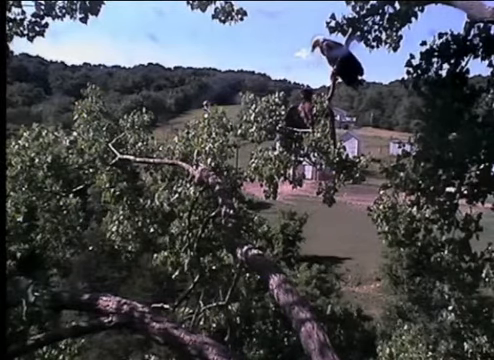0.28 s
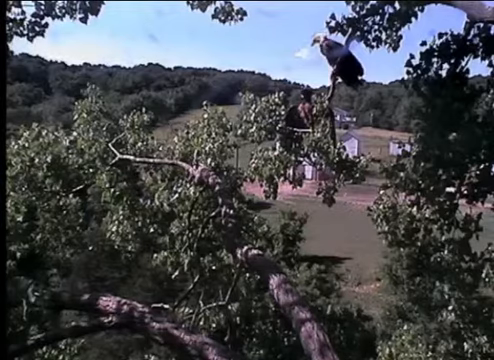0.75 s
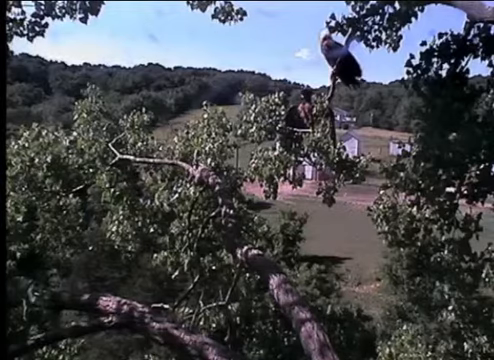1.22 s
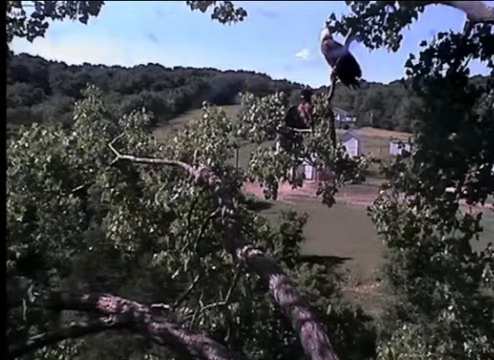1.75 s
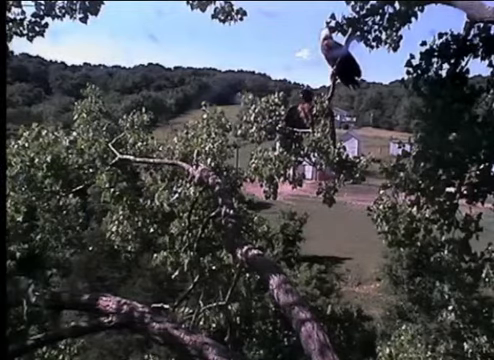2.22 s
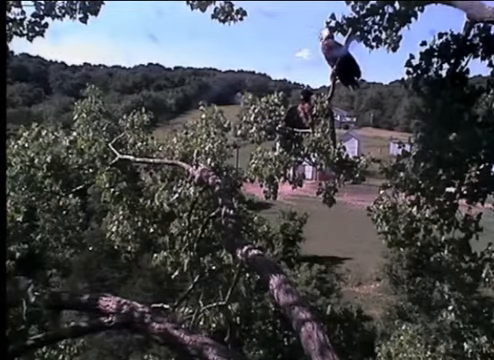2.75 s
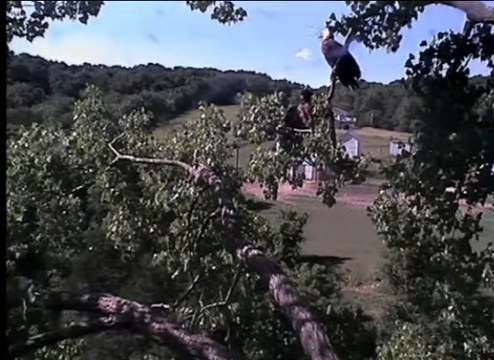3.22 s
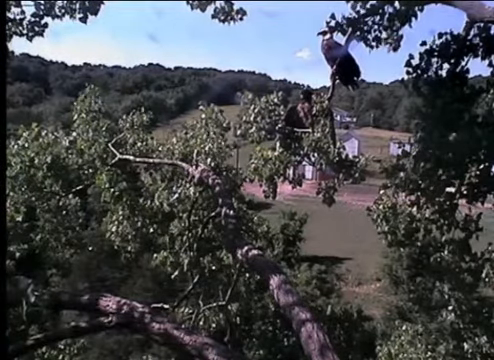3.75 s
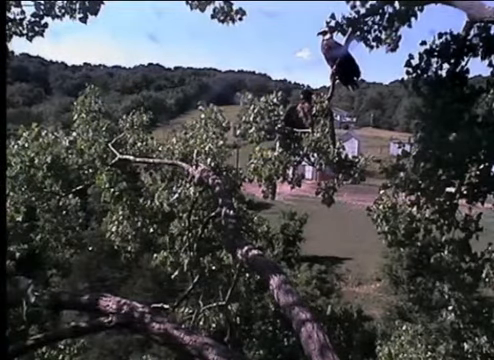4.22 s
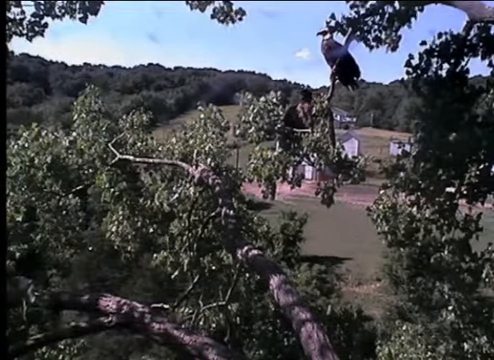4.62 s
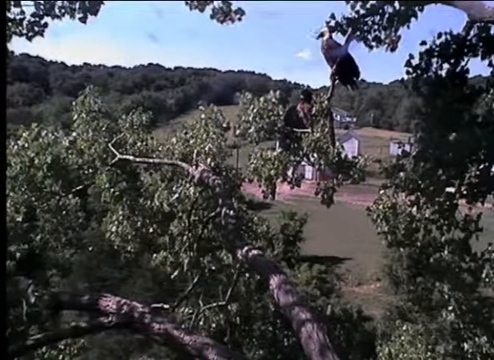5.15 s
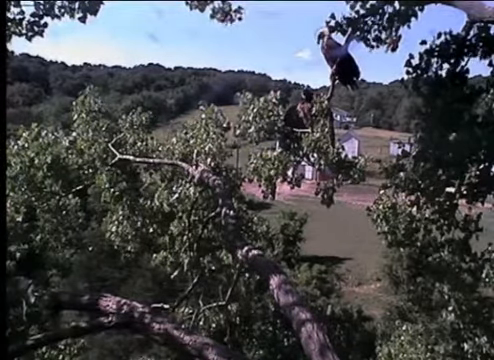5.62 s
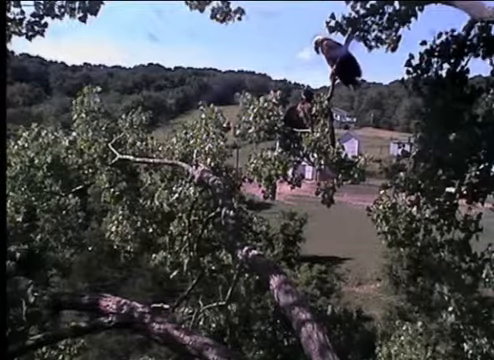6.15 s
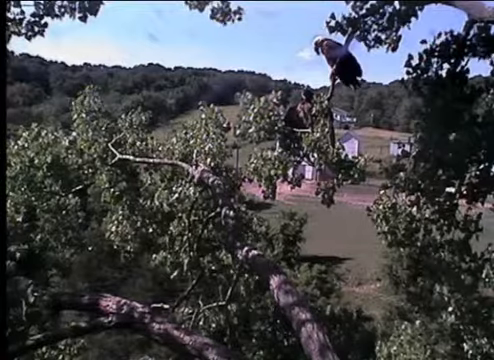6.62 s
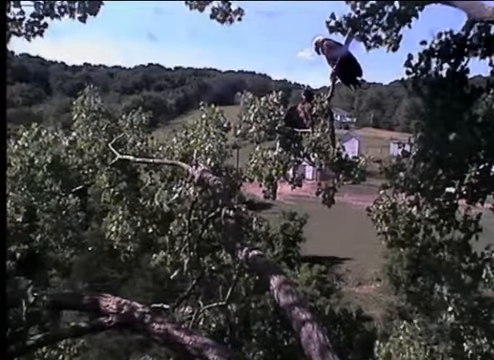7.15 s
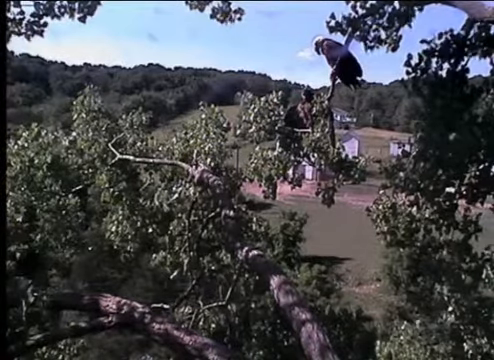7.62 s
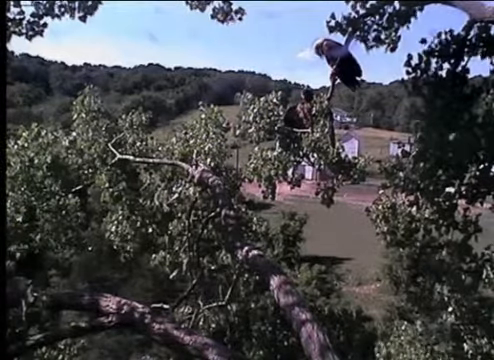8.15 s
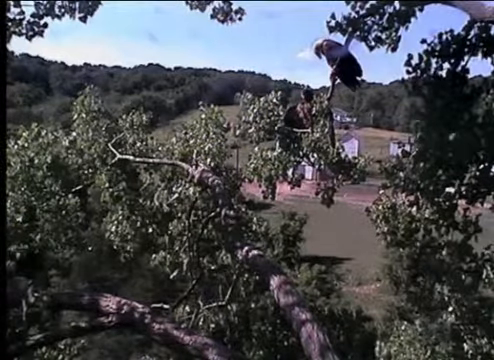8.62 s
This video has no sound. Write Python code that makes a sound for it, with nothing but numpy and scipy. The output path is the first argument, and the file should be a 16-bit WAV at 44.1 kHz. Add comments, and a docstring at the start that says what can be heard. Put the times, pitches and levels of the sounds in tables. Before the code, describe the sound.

Shrill eagle whistles come about once a second, each climbing then breaking off abruptly, with leafy echoes under constant strong microphone-line hiss.

```python
"""An eagle in a treetop repeats a thin rising whistle that drops away at its end: a wavering near sine with
overtones folded back down by the converter, and one brief high overtone as a bell-shaped tone of its own.
Small birds chip in as short bell-shaped whistles further off. Branches, ground and leaves return echoes and
a tail; a limiter evens out the notes. The long microphone line adds loud pink hiss, a faint hum and a slow
drift. Only the left input is wired: the right one is a constant near full scale with faint low-passed noise."""
import sys
import numpy as np
from scipy import signal
from scipy.fft import rfft, irfft, next_fast_len
from scipy.io import wavfile
from scipy.ndimage import uniform_filter1d

SR = 44100
rng = np.random.default_rng(int(sys.argv[2]) if len(sys.argv) > 2 else 0)


def digitize_waveform(pressure):
    """Quantize a signal to 16-bit integers and store it at the path in sys.argv[1].

    Rows of a 2-D input are taken as channels; values are limited to [-1, 1].
    """
    field = np.atleast_2d(pressure).T
    bounded = np.clip(field, -1, 1)
    quanta = np.round(bounded * 32767).astype(np.int16)
    wavfile.write(sys.argv[1], SR, quanta)


N = 391166

# Note and bird levels are set ahead of limiter and preamp; line levels ahead of the preamp.
# Held rising notes, one list each, up to where the pitch breaks: [t/s, f/Hz]
HELD_NOTES = [
    [(0.135, 4060), (0.18, 4135), (0.195, 4090), (0.245, 4230), (0.295, 4220), (0.323, 4160), (0.433, 4235),
     (0.511, 4335), (0.559, 4340), (0.573, 4260), (0.582, 4091)],
    [(1.042, 4119), (1.08, 4180), (1.115, 4240), (1.24, 4210), (1.3, 4240), (1.33, 4360), (1.478, 4490),
     (1.52, 4510), (1.533, 4180)],
    [(1.99, 3870), (2.016, 4030), (2.036, 4130), (2.1, 4075), (2.256, 4290), (2.282, 4390), (2.406, 4530),
     (2.424, 4100)],
    [(2.854, 3930), (2.876, 3940), (2.89, 4080), (2.91, 4060), (2.928, 4170), (2.96, 4200), (2.985, 4110),
     (3.02, 4195), (3.05, 4185), (3.216, 4310), (3.24, 4260), (3.257, 4160)],
    [(3.77, 3855), (3.795, 3980), (3.83, 4010), (3.856, 3950), (3.98, 4135), (4.056, 4144), (4.104, 4070),
     (4.12, 3950)],
    [(4.742, 3940), (4.804, 3950), (4.808, 4080), (4.82, 3960), (4.898, 4070), (5.04, 4140), (5.066, 4120),
     (5.085, 4020)],
    [(5.632, 3820), (5.642, 3960), (5.78, 4090), (5.994, 4190), (6.128, 4380), (6.14, 4220), (6.146, 4100)],
    [(6.585, 3830), (6.665, 4030), (6.899, 4180), (6.933, 4122), (6.945, 4020)],
    [(7.404, 3480), (7.422, 3470), (7.438, 3564), (7.498, 3605), (7.504, 3720), (7.52, 3660), (7.556, 3825),
     (7.652, 3920), (7.692, 4070), (7.758, 4104), (7.816, 4100), (7.85, 4000)],
    [(8.368, 3919), (8.374, 3950), (8.464, 4145), (8.652, 4173), (8.722, 4100), (8.786, 4110),
     (8.836, 4440), (8.87, 4540)],
]
# Short, stepping notes that open each call: [t/s, length/s, first f/Hz, last f/Hz, level/dB]
OPENING_NOTES = [(0.03, .036, 3480, 3560, -41.5), (0.068, .058, 3930, 4060, -38.5),
                 (0.953, .026, 3600, 3540, -39.5), (0.985, .018, 4040, 3930, -36),
                 (1.005, .029, 3960, 4060, -36.5), (1.919, .02, 3520, 3550, -38),
                 (1.941, .015, 3900, 3910, -39), (1.958, .03, 3700, 3830, -39),
                 (2.776, .014, 3140, 3230, -42), (2.792, .029, 3600, 3530, -36),
                 (2.824, .022, 3870, 3820, -38.5), (3.68, .015, 3460, 3420, -44),
                 (3.702, .035, 3610, 3570, -38), (3.747, .019, 3680, 3750, -40),
                 (4.604, .064, 3440, 3610, -39), (4.693, .046, 3710, 3780, -39.5),
                 (5.517, .029, 3440, 3480, -40), (5.549, .032, 3580, 3560, -36.5),
                 (5.59, .018, 3670, 3730, -40), (5.611, .014, 3810, 3840, -39),
                 (6.485, .019, 2950, 3300, -45), (6.507, .024, 3480, 3460, -39.5),
                 (6.534, .017, 3580, 3700, -39), (6.555, .021, 3630, 3720, -37.5),
                 (7.388, .013, 3120, 3170, -42), (8.308, .056, 3820, 3900, -42)]
# Moments when the voice catches inside a held note: [t/s]
VOICE_CATCHES = [2.3, 7.5, 7.63]
# Overtones of the whistle: [multiple of the pitch, level against the whistle at the reference pitch/dB]
WHISTLE_OVERTONES = [(2, -23), (3, -12)]
# Short bell-shaped tones, of two sources: [t/s, f/Hz, level/dB, length/s]
BELL_TONES = [(3.118, 5000, -40, 0.021), (3.356, 3720, -45, 0.021), (3.378, 4010, -39, .014),
              (6.567, 7300, -43, 0.057)]
HIGH_OVERTONES = BELL_TONES[3:]  # brief high overtone of the whistle near 7300 Hz
BIRD_CHIPS = BELL_TONES[:3]  # chips of small birds further off
# Echoes off branches and ground: [delay/s, level before the echo band/dB]
TREE_ECHOES = [(.008, -15), (.016, -14), (.026, -13), (.037, -13.5), (.052, -17), (.07, -20)]
# Edges of the narrow band the echoes and tail are heard in, duller than the note: [f/Hz]
ECHO_BAND = [3300, 4230]
# Spectrum of the line hiss, only its shape counts: [f/Hz, relative level per Hz/dB]
HISS_SHAPE = [(1, 4), (4, -5), (26, -16), (130, -20), (1300, -30), (4000, -35), (7000, -36), (8200, -38.5),
              (9300, -43), (10200, -52), (10900, -65), (11100, -73), (11600, -78)]
# Hum lines: [f/Hz, rms level/dB]
HUM_LINES = [(187.5, -49), (375, -54)]

# Held note: louder the higher it is pushed, and softer at its start
HELD_DB, HELD_DB_PER_KHZ, SWELL_DB = -33, 5, -4.5  # level at the reference pitch
REFERENCE_HZ = 4150
# The pitch drops as the breath runs out
FALL_S, FALL_HZ, FALL_DB = .018, 860, -5.5
EDGE_S, SILENT_DB = .0014, -70  # notes start and stop abruptly
GLIDE_S = .004  # the pitch turns its corners smoothly
CATCH_S, CATCH_DB = .007, -8  # half-width and depth of a catch
OPENING_CRACK = .1  # amount of cracking, 1 in the fall
BREAK_DB = 11  # deepest drop-outs at full crack
OVERTONE_DB_PER_KHZ = -6  # per multiple, either side of the reference pitch
CONVERTER_HZ = 16000  # sampling rate that folds the overtones

FLUTTER_S, FLUTTER_PER_S = .00025, 30  # leaves shake the echo delays
LEAVES_DB, LEAVES_T60_S = -18, .25  # scattered tail off the foliage, ahead of the echo band
LIMIT_DB, LIMIT_RATIO, LIMIT_S = -35, 6, .003  # rms threshold, ratio, averaging time

HISS_DB = -36  # rms from 500 to 2000 Hz
RAIL_NOISE_DB, RAIL_NOISE_HZ = -72.5, 186  # faint noise on the right: rms, low-pass corner
PREAMP_DB = 6
OFFSET, RAIL = -.17, .9993  # resting values of left and right, full scale = 1
TOP_HZ = 11450  # where the steep top cut reaches its floor


def undb(db):
    """dB to gain."""
    return 10 ** (np.asarray(db) / 20)


def walk(rate):
    """Random levels held 1 / rate s and slewed twice; spread near 1."""
    hold = int(SR / rate)
    steps = np.repeat(rng.standard_normal(N // hold + 1), hold)
    slewed = uniform_filter1d(uniform_filter1d(steps, hold), hold)
    return 1.3 * slewed[:N]


def eagle(t):
    """A near sine that wavers a little; its overtones mirror at the converter's half rate."""
    hz, db, crack = phrase(t)
    # a cracking voice wobbles and breaks into short pieces
    hz = hz * (1 + (.002 + .06 * crack) * walk(250))
    dropouts = BREAK_DB * crack * np.clip(walk(400), 0, 1)
    db = db + .3 * walk(60) - dropouts

    phase = 2 * np.pi * np.cumsum(hz) / SR
    clock = 2 * np.pi * CONVERTER_HZ * t
    voice = np.sin(phase)
    for multiple, below_db in WHISTLE_OVERTONES:
        too_high = multiple * hz > CONVERTER_HZ / 2
        folded = np.where(too_high, clock - multiple * phase, multiple * phase)
        damped_db = OVERTONE_DB_PER_KHZ * multiple * np.abs(hz - REFERENCE_HZ) / 1000
        overtone_db = below_db + damped_db + .65 * walk(17)
        voice = voice + undb(overtone_db) * np.sin(folded)
    whistle = np.sqrt(2) * undb(db) * voice  # a sine's rms to its peak
    return whistle + bell_tones(t, HIGH_OVERTONES)


def phrase(t):
    """Pitch, level and crack of all notes: a little crack as a note opens, full crack in each fall."""
    notes = [held_note(points) for points in HELD_NOTES]
    for start, length, first_hz, last_hz, db in OPENING_NOTES:
        first = (start, first_hz, db, OPENING_CRACK)
        last = (start + length, last_hz, db, OPENING_CRACK)
        notes.append([first, last])

    rows = []
    for note in notes:
        start, first_hz, _, first_crack = note[0]
        end, last_hz, _, last_crack = note[-1]
        rows.append((start - EDGE_S, first_hz, SILENT_DB, first_crack))
        rows += note
        rows.append((end + EDGE_S, last_hz, SILENT_DB, last_crack))
    times, *columns = np.transpose(sorted(rows))
    hz, db, crack = (np.interp(t, times, column) for column in columns)

    for moment in VOICE_CATCHES:
        db = db + CATCH_DB * np.exp(-((t - moment) / CATCH_S) ** 2)
    return uniform_filter1d(hz, int(GLIDE_S * SR)), db, crack


def held_note(points):
    """Higher pitch is pushed louder; the note swells in and its pitch falls as the breath runs out."""
    note = []
    for s, hz in points:
        note.append((s, hz, HELD_DB + HELD_DB_PER_KHZ * (hz - REFERENCE_HZ) / 1000, 0))
    s, hz, db, _ = note[0]
    note[0] = (s, hz, db + SWELL_DB, OPENING_CRACK)
    s, hz, db, _ = note[-1]
    # the pitch falls fastest in the first third
    note.append((s + FALL_S / 3, hz - FALL_HZ * .6, db + FALL_DB, 1))
    note.append((s + FALL_S, hz - FALL_HZ, db + FALL_DB, 1))
    return note


def bell_tones(t, tones):
    """Sines that rise slightly under bell-shaped envelopes."""
    out = 0
    for s, hz, db, length in tones:
        u = t - s
        bell = np.exp(-(2 * u / length) ** 2)
        out = out + undb(db) * bell * np.sin(2 * np.pi * hz * u * (1 + .76 * u))
    return np.sqrt(2) * out


def small_birds(t):
    """Each chip is a bell-shaped whistle that rises slightly."""
    return bell_tones(t, BIRD_CHIPS)


def trees(x):
    """A few soft echoes whose delays flutter with the leaves, and a diffuse tail, both in a narrow band."""
    n = np.arange(N)
    echoes = 0
    for delay, db in TREE_ECHOES:
        fluttering = delay + FLUTTER_S * walk(FLUTTER_PER_S)
        echoes = echoes + undb(db) * np.interp(n - SR * fluttering, n, x)

    u = np.arange(SR // 2) / SR
    tail = rng.standard_normal(len(u)) * (u > .01) * undb(-60 * u / LEAVES_T60_S)
    tail /= np.linalg.norm(tail)  # unit energy
    wet = echoes + undb(LEAVES_DB) * signal.fftconvolve(x, tail)[:N]
    dull = signal.butter(4, ECHO_BAND, "band", fs=SR, output="sos")
    return x + signal.sosfilt(dull, wet)


def limiter(x):
    """Squeezes loud notes by their short-term rms and lets go quickly, so the echoes stand out after them."""
    window = int(LIMIT_S * SR)
    power = uniform_filter1d(uniform_filter1d(x ** 2, window), window)
    rms = np.sqrt(np.abs(power))  # abs guards against rounding below zero
    overshoot = np.maximum(rms / undb(LIMIT_DB), 1)
    return x * overshoot ** (1 / LIMIT_RATIO - 1)


def line_hiss():
    """Random noise shaped to pink hiss that reaches down to a slow drift; its level wavers a little."""
    size = next_fast_len(N)
    f = np.maximum(np.arange(size // 2 + 1) * SR / size, .3)  # keeps the logarithm finite
    hz, db = np.transpose(HISS_SHAPE)
    gain = undb(np.interp(np.log(f), np.log(hz), db))
    level_band = (f > 500) & (f < 2000)
    gain /= np.sqrt(2 * np.sum(gain[level_band] ** 2) / size)  # unit rms in that band
    hiss = irfft(rfft(rng.standard_normal(size)) * gain, size)[:N]
    return undb(HISS_DB + .35 * walk(4)) * hiss


def line_hum(t):
    """Steady sine tones whose levels wander slowly."""
    hum = 0
    for hz, db in HUM_LINES:
        hum = hum + np.sqrt(2) * undb(db + 1.4 * walk(2.2)) * np.sin(2 * np.pi * hz * t)
    return hum


def faint_low_noise():
    """Random noise with only its lows left, set to a faint rms level."""
    low_pass = signal.butter(2, RAIL_NOISE_HZ, fs=SR, output="sos")
    lows = signal.sosfilt(low_pass, rng.standard_normal(N))
    return undb(RAIL_NOISE_DB) * lows / lows.std()


def scene():
    """Birds among trees, limited, then line noise on the left; faint low-passed noise on the right."""
    t = np.arange(N) / SR
    birds = limiter(trees(eagle(t) + small_birds(t)))
    left = birds + line_hiss() + line_hum(t)
    return np.array([left, faint_low_noise()])


def record(dry):
    """Preamp gain, the resting offset of each input, clipping, then a steep cut of the top."""
    wired = undb(PREAMP_DB) * dry + np.array([[OFFSET], [RAIL]])
    top_cut = signal.cheby2(10, 20, TOP_HZ, fs=SR, output="sos")
    return signal.sosfiltfilt(top_cut, np.clip(wired, -1, 1))


dry = scene()
out = record(dry)
digitize_waveform(out)
```